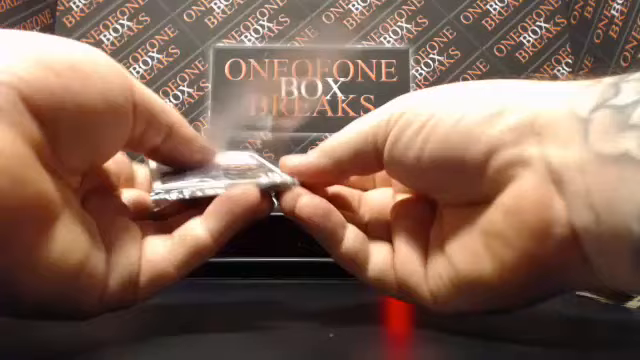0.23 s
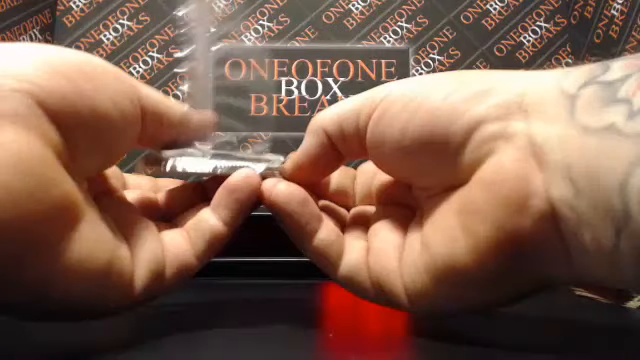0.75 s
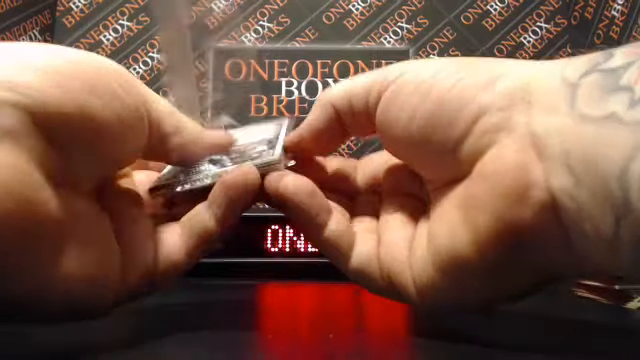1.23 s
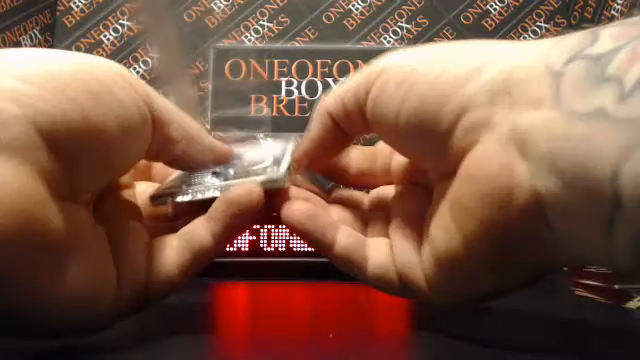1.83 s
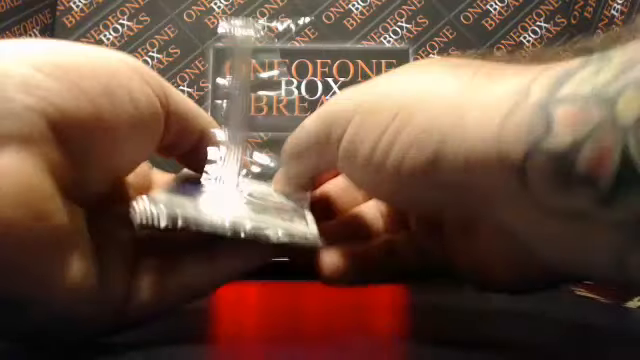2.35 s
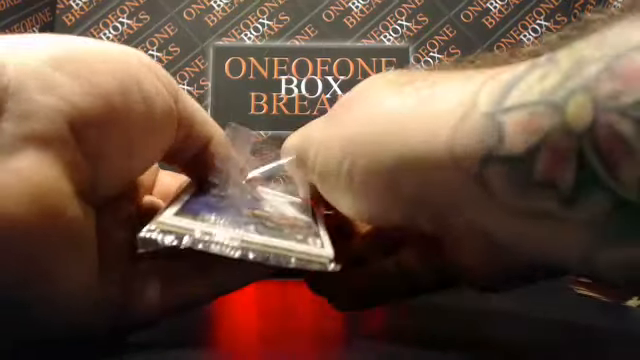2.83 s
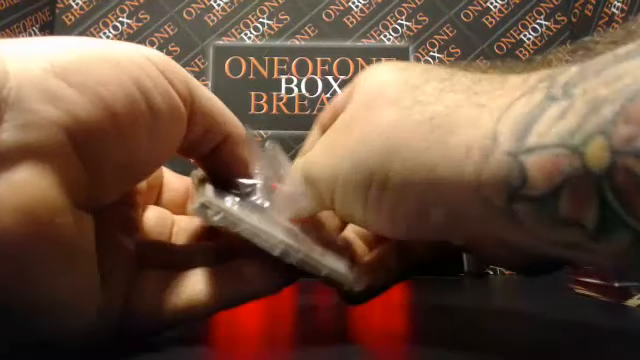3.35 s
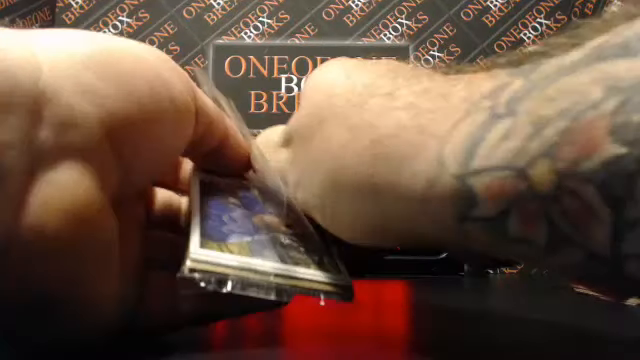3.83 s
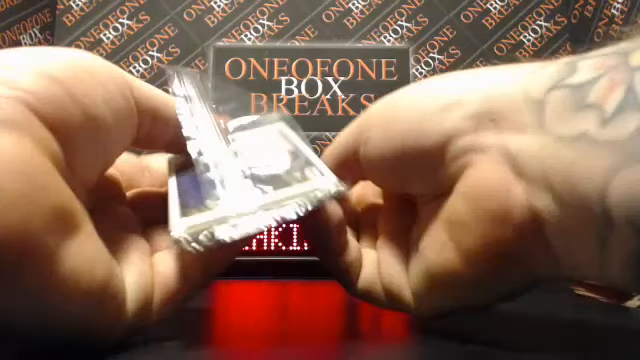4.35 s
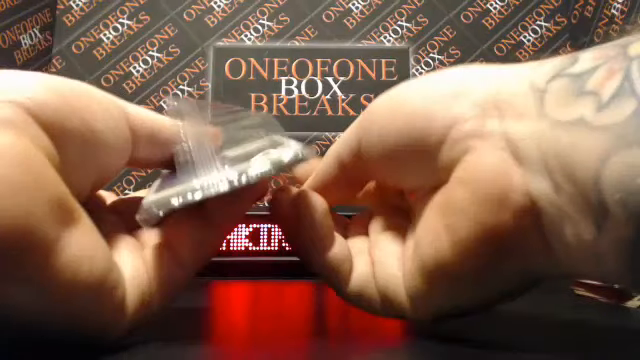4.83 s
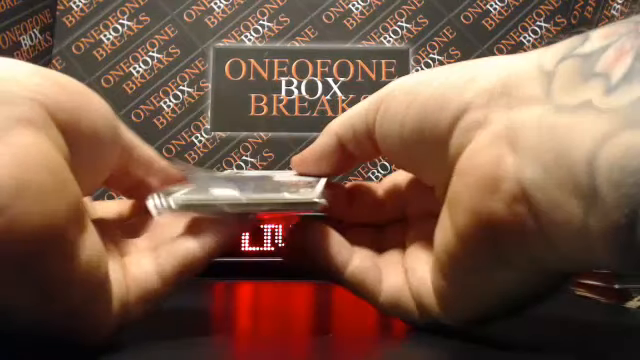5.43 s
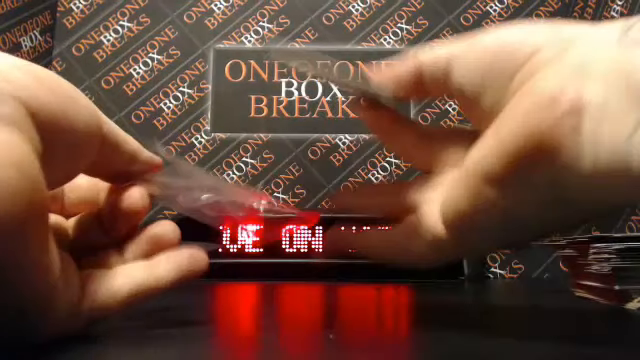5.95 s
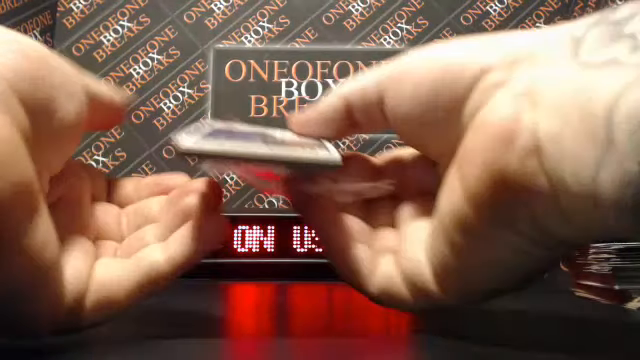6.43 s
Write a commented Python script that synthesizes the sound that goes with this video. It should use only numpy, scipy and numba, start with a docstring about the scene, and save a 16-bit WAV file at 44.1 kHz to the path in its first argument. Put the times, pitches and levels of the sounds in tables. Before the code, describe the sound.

Hands crinkle a small clear film wrapper around a card, crisp ticks and duller pops, soft desk bumps, quiet fan hum behind.

```python
"""Sharp clicks over faint crackle, as two hands work a thin, stiff plastic wrapper around a card.
Each crease that snaps is a group of short damped rings in patches of film, with a short noise tail.
Filtered noise gives the rough scrapes and a thin late hiss; one seam pops with a push of air.
Fingers bump the desk now and then, as slow low rings, over a low fan drone of flickering noise bands.
A small microphone close by thins the bass, holds quiet treble down and cuts the top steeply."""
import sys
import numpy as np
from scipy import signal
from scipy.fft import rfft, irfft
from scipy.io import wavfile
from scipy.ndimage import uniform_filter1d, minimum_filter1d
from numba import njit

SR = 44100
rng = np.random.default_rng(int(sys.argv[2]) if len(sys.argv) > 2 else 0)


def materialize(psi):
    """Save the field psi as 16-bit PCM at rate SR to the path in sys.argv[1].

    A 1-D psi becomes a single channel; in a 2-D psi each row is a channel.
    """
    bounded = np.clip(np.atleast_2d(psi).T, -1, 1)
    quanta = np.round(bounded * 32767).astype(np.int16)
    wavfile.write(sys.argv[1], SR, quanta)


N = 294588  # length [samples]
BRIGHT_HZ, DULL_HZ = (2500, 8000), (630, 2500)  # the film's two ranges of ringing


def undb(db):
    """Amplitude ratio of a level: ten to the power of decibels over twenty."""
    return 10 ** (np.asarray(db) / 20)


def level(x, db):
    """Scale to an rms level, the root of the mean power."""
    return x * undb(db) / np.sqrt(np.mean(x ** 2))


def band(x, lo_hz, hi_hz, order=2):
    """Butterworth band-pass: a passband without ripple."""
    return signal.sosfilt(signal.butter(order, [lo_hz, hi_hz], "bandpass", fs=SR, output="sos"), x)


def noise(n=N):
    """White noise: equal power at every frequency."""
    return rng.standard_normal(n)


def walk(rate):
    """Slow random modulation: values held 1 / rate s and smoothed twice, with a spread near 1."""
    k = int(SR / rate)
    steps = np.repeat(noise(N // k + 1), k)
    return np.sqrt(2) * uniform_filter1d(uniform_filter1d(steps, k), k)[:N]


@njit
def rings(s, hz, tau, size, phase, n, sr):
    """Superposition of damped oscillations that swell smoothly for tau seconds and then die away."""
    out = np.zeros(n)
    for k in range(len(s)):
        first = int(s[k] * sr) + 1
        for i in range(max(first, 0), min(first + int(6 * tau[k] * sr), n)):
            t = i / sr - s[k]
            u = t / tau[k]
            envelope = u * u * np.exp(2 - 2 * u)  # reaches 1 at t = tau
            out[i] += size[k] * envelope * np.sin(2 * np.pi * hz[k] * t + phase[k])
    return out


def clicks(s, main_hz, lo_hz, hi_hz, db, cycles, least_s, count, rest_db, smear_s, lean=1):
    """Modal excitation: a snap rings one patch of film and, a hair apart, weaker ones over the band."""
    fall_db_oct = 8  # patches far from the main pitch ring less
    faint_fall, faint_db = 0.45, -29.0  # more so per dB that a snap is fainter than this level
    chance = rng.random((len(s), count, 3))
    other = np.arange(count) > 0
    spread = lo_hz * (hi_hz / lo_hz) ** ((np.arange(count) - chance[..., 0]) / (count - 1))
    # a pitch of 0 means any pitch; lean above 1 favours low ones
    any_hz = lo_hz * (0.879 * hi_hz / lo_hz) ** chance[:, 0, 0] ** lean
    own = np.where(main_hz > 0, main_hz, any_hz)
    f = np.where(other, spread, own[:, None])
    start = s[:, None] + smear_s * chance[..., 1] * other
    fall = fall_db_oct + faint_fall * np.maximum(faint_db - db, 0)[:, None]
    octaves = np.abs(np.log2(f / own[:, None]))
    size = undb(db[:, None] + rest_db * other - fall * octaves)
    swell = least_s + cycles / f
    phase = 2 * np.pi * chance[..., 2]
    flat = (np.ravel(v) for v in (start, f, swell, size, phase))
    return rings(*flat, N, 1. * SR)


def snaps():
    """Impulsive release of strain: a crease rings a bright tick over a duller pop, or one patch alone."""
    # creases with two rings: (time [s], bright peak level [dB], bright ring [Hz],
    # dull peak level [dB], dull ring [Hz])
    double_creases = [(0.0138, -38.5, 5590, -55, 1100), (0.041, -37, 3800, -42, 960),
                      (0.307, -42, 3230, -52, 880), (0.4034, -30, 3360, -30, 970),
                      (1.0668, -35.5, 3670, -43, 2160), (1.0978, -30, 3700, -31, 1030),
                      (1.1097, -26.5, 6660, -29.5, 940), (1.4541, -45, 4180, -38.5, 826),
                      (1.5706, -34.0, 5660, -44.0, 2370), (1.6273, -33, 3880, -40.5, 1210),
                      (1.6387, -37, 3240, -46, 1230), (1.7761, -35.5, 6830, -38, 660),
                      (1.8743, -43.5, 4720, -52.0, 2200), (1.9159, -39, 5000, -40, 696),
                      (1.9334, -36.0, 5900, -32, 810), (1.9927, -35, 6360, -33, 2320),
                      (2.0012, -36.5, 4440, -36, 2490), (2.0985, -35.5, 4780, -38, 2300),
                      (2.1049, -34.5, 3770, -39, 2460), (2.1193, -36, 3900, -36, 2330),
                      (2.1777, -47, 6010, -38, 2350), (2.1907, -33.5, 4900, -28.5, 2190),
                      (2.2338, -40, 6090, -52, 2490), (2.2623, -23.5, 5700, -18, 1180),
                      (2.2737, -23.5, 5570, -23.5, 910), (2.3112, -33, 4300, -36, 950),
                      (2.3248, -34.5, 5500, -26.5, 1800), (2.3579, -42.0, 4940, -37.5, 2290),
                      (2.3954, -34.5, 2830, -48, 2000), (2.4926, -35.5, 2520, -33.5, 1700),
                      (2.4977, -38, 7060, -33, 2350), (2.506, -34.0, 4930, -36, 1900),
                      (2.5762, -30.5, 6060, -27.5, 2400), (2.6126, -36, 6320, -30.5, 2050),
                      (2.6726, -31, 7200, -38, 2250), (2.6853, -35.5, 5820, -36.5, 1970),
                      (2.7173, -22, 5960, -24, 1265), (2.8822, -43, 5030, -32.5, 1060),
                      (3.0244, -31.5, 3950, -32, 1190), (3.061, -34, 3330, -38, 2080),
                      (3.0698, -29, 3000, -33, 1890), (3.1005, -37.5, 3300, -41.5, 1100),
                      (3.2153, -23.5, 2790, -27, 1690), (3.2294, -24.5, 4900, -20.5, 2220),
                      (3.2378, -22.5, 4650, -19.5, 1220), (3.258, -39, 5200, -36.5, 1280),
                      (3.3139, -30, 2810, -39.5, 1530), (3.3532, -38, 4890, -34.5, 2180),
                      (3.3581, -34.5, 4400, -40, 1850), (3.4609, -38, 4780, -50, 2480),
                      (3.646, -23, 2870, -28.5, 984), (3.672, -35.5, 2770, -36.5, 1090),
                      (3.7143, -33.5, 6200, -34.5, 1700), (3.7474, -32, 2590, -28.5, 2440),
                      (3.788, -23, 6980, -18.5, 1200), (3.829, -45, 5230, -29, 1390),
                      (3.835, -24.5, 4760, -23.5, 2460), (3.8425, -21.5, 5560, -21.5, 1850),
                      (3.8881, -37, 4800, -30, 2400), (3.8925, -37, 5970, -30, 1530),
                      (3.91, -34.5, 5770, -34.5, 1380), (3.9452, -39, 2650, -40, 2470),
                      (3.9526, -31.5, 3470, -32.5, 2360), (3.9777, -34.5, 5460, -31, 2140),
                      (4.0493, -36, 3130, -39, 2300), (4.1593, -35.5, 5000, -41.5, 1880),
                      (4.3439, -22.5, 4500, -23.5, 1316), (4.4432, -32, 4500, -26.5, 2120),
                      (4.453, -48, 6160, -43, 1030), (4.585, -28, 4470, -28, 1760),
                      (4.5983, -37.5, 2710, -39.5, 773), (4.81, -31, 4600, -33, 1270),
                      (4.8887, -42, 6140, -38, 2430), (4.905, -30.5, 5000, -29.5, 2040),
                      (4.9258, -43, 5100, -46, 2350), (5.0495, -32, 5100, -33, 1890),
                      (5.0635, -31.5, 4900, -35, 2040), (5.2185, -31, 6080, -32.5, 2000),
                      (5.2337, -33, 2630, -36.5, 1960), (5.2417, -28, 5330, -35.5, 2270),
                      (5.2503, -40.5, 5850, -31, 1245), (5.4193, -38, 6200, -40, 2370),
                      (5.4372, -55, 5840, -41.5, 1610), (5.7016, -31, 3260, -42.5, 2080),
                      (5.7058, -28.5, 5500, -29, 2210), (5.7413, -26, 3800, -31, 890),
                      (5.7755, -24.5, 5040, -27.5, 860), (6.066, -34, 4840, -32.5, 2650),
                      (6.3332, -30.5, 4520, -36.5, 2460), (6.448, -35, 3100, -55, 2430),
                      (6.4578, -31, 3030, -67, 1980), (6.4678, -35, 3920, -52, 2120),
                      (6.479, -40, 3980, -36.5, 2180), (6.492, -39, 5170, -42, 2260),
                      (6.499, -34, 3460, -33, 2100)]
    # creases with one main ring: (time [s], peak level [dB], ring [Hz])
    single_creases = [(0.0751, -32.5, 3120), (0.076, -38.0, 1000), (0.137, -40.5, 650),
                      (0.1377, -25.5, 5040), (0.1673, -33, 5360), (0.3427, -40, 2040), (0.3685, -34, 6630),
                      (0.4186, -41.0, 1800), (0.4605, -40, 6860), (0.499, -35.5, 3270),
                      (0.626, -48.0, 4760), (0.7312, -38.5, 3460), (0.751, -39.5, 3730),
                      (0.813, -44.5, 5020), (0.928, -44, 3850), (1.0113, -30, 5160), (1.0395, -32, 3800),
                      (1.0762, -32.5, 6230), (1.0892, -31.5, 4730), (1.196, -49, 5700),
                      (1.2285, -38.5, 6160), (1.345, -51.5, 2180), (1.4369, -21, 4060), (1.4816, -37, 6060),
                      (1.4937, -39, 3370), (1.5093, -31, 5150), (1.5149, -25, 4950), (1.561, -34, 4400),
                      (1.694, -37, 3530), (1.787, -24.5, 4200), (1.825, -34, 6400), (1.8569, -32, 1810),
                      (1.9795, -38.5, 6210), (1.9887, -33, 6600), (2.1556, -27, 6260), (2.21, -31, 2800),
                      (2.2146, -31, 6840), (2.246, -33.0, 2080), (2.2875, -27, 2500), (2.484, -30, 6940),
                      (2.5391, -31.5, 4900), (2.7803, -27, 2970), (2.8475, -30.5, 5900),
                      (2.859, -31.5, 4690), (2.8685, -29.0, 4840), (2.8736, -24, 1520), (2.9013, -33, 5100),
                      (2.9369, -30, 5630), (3.0111, -22, 6000), (3.0378, -36, 4470), (3.162, -22, 2400),
                      (3.1711, -14.5, 1780), (3.2453, -26.5, 4720), (3.2532, -27.0, 4830),
                      (3.3652, -23.5, 5400), (3.3702, -36, 4760), (3.4008, -32, 6390),
                      (3.4751, -22.5, 5900), (3.4833, -34, 4550), (3.5463, -45, 3700), (3.6229, -32, 1390),
                      (3.6884, -35, 6000), (3.6984, -25.5, 5880), (3.776, -38.5, 2600),
                      (3.8113, -18.5, 2480), (3.8369, -21.5, 5690), (3.852, -31.5, 1080),
                      (4.062, -24.5, 5070), (4.1056, -29.5, 5600), (4.1203, -32.5, 5250),
                      (4.143, -22.5, 5620), (4.1843, -27, 4730), (4.192, -35.5, 4710),
                      (4.6752, -31.5, 4730), (4.823, -28, 6000), (4.8256, -30.5, 908), (4.8459, -41, 4340),
                      (4.855, -30.5, 4880), (4.8627, -21, 5700), (4.934, -36.5, 2020),
                      (5.0403, -31.5, 5020), (5.0825, -35.5, 5400), (5.1083, -30.5, 4800),
                      (5.193, -33, 6320), (5.2008, -22.5, 5840), (5.2466, -28.5, 5420),
                      (5.5856, -38.5, 5120), (5.8768, -31.5, 4300), (5.9779, -44, 2900),
                      (6.294, -46.5, 4560), (6.3824, -38, 3880)]
    deep_hz = 2250  # single creases below this are dull pops
    tick_low_hz = 1092  # the faint side patches of a tick reach down to here
    s, bright_db, bright_hz, dull_db, dull_hz = np.transpose(double_creases)
    tick_s, tick_db, tick_hz = np.transpose(single_creases)
    s, tick_s = s - .0005, tick_s - .0005  # the swell begins just before the peak
    bright = clicks(s, bright_hz, *BRIGHT_HZ, bright_db, cycles=0.62, least_s=0.00025,
                    count=5, rest_db=-2.5, smear_s=0.00043)
    dull = clicks(s, dull_hz, *DULL_HZ, dull_db, cycles=1.0, least_s=.0001,
                  count=3, rest_db=-11.0, smear_s=0.00083)
    deep = tick_hz < deep_hz
    ticks = clicks(tick_s[~deep], tick_hz[~deep], tick_low_hz, BRIGHT_HZ[1], tick_db[~deep],
                   cycles=0.68, least_s=0.00026, count=6, rest_db=-6.0, smear_s=0.000796)
    low = clicks(tick_s[deep], tick_hz[deep], *DULL_HZ, tick_db[deep],
                 cycles=0.9, least_s=.0001, count=3, rest_db=-16.0, smear_s=0.0008)
    return bright + ticks, dull + low


def crackle(per_s, lo_hz, hi_hz, scatter_db, cycles, lean=1):
    """Random superposition: faint clicks at random moments, a few louder than the rest; rms 1."""
    chance = rng.random((int(per_s * N / SR), 2))
    db = -scatter_db * np.log(np.maximum(chance[:, 1], .03))
    s = chance[:, 0] * N / SR
    grains = clicks(s, 0 * s, lo_hz, hi_hz, db, cycles, least_s=.0001,
                    count=2, rest_db=-6.5, smear_s=0.000476, lean=lean)
    return level(grains, 0)


def swell_envelope(x, rise_s, fall_s):
    """Smoothed energy: a short swell that rises just ahead of each loud snap and falls after it."""
    t = np.arange(-.06, .06, 1 / SR)
    near = np.exp(-(t / np.where(t < 0, rise_s, fall_s)) ** 2)
    return np.sqrt(np.abs(signal.fftconvolve(x ** 2, near / near.sum(), "same")))


def bursts(s, length, db):
    """Incoherent addition: each burst swells to its middle and fades again; their powers add."""
    edge_db, shape = -7, 1.31  # level at the ends of the length, re the middle; how round the top is
    step = 32  # samples for which the envelope is held
    away = np.abs(np.arange(0, N, step) / SR - s[:, None]) / (length[:, None] / 2)
    power = undb(db[:, None] + edge_db * away ** shape) ** 2
    return np.repeat(np.sqrt(power.sum(axis=0)), step)[:N]


def rub(hz):
    """Band-limited noise: a smooth hiss under the crackle, as of film on film."""
    return undb(-12) * level(band(noise(), *hz), 0)


def rustle(bright, dull):
    """Amplitude modulation: grainy noise shaped into short bursts and a short swell round each snap."""
    # short bursts of faint crackle, many of them tails of snaps:
    # (middle [s], length [s], bright level [dB], dull level [dB])
    faint_bursts = [(0.008, 0.14, -67, -60), (0.245, 0.042, -63, -59), (0.301, 0.051, -62, -54),
                    (0.353, 0.049, -63.5, -64.5), (0.452, 0.033, -59, -54), (0.504, 0.023, -59, -60.5),
                    (0.746, 0.051, -63, -80), (0.821, 0.017, -57, -73), (1.092, 0.059, -50.5, -52),
                    (1.482, 0.094, -51, -70), (1.503, 0.06, -61, -49), (1.57, 0.016, -58, -58),
                    (1.636, 0.029, -55.5, -52.5), (1.78, 0.023, -55.5, -48.5), (1.84, 0.074, -60.5, -70),
                    (1.932, 0.031, -51.5, -48), (2.003, 0.015, -47, -51.5), (2.023, 0.03, -59, -65),
                    (2.115, 0.035, -51, -60), (2.19, 0.066, -56.5, -65), (2.276, 0.057, -42.5, -41),
                    (2.328, 0.041, -49.5, -69), (2.398, 0.016, -50.5, -57.5), (2.508, 0.019, -58, -53),
                    (2.62, 0.019, -56, -50), (2.675, 0.031, -55.5, -79), (2.792, 0.021, -45.5, -58.5),
                    (2.88, 0.039, -44, -49), (3.023, 0.033, -47.5, -54), (3.18, 0.071, -53, -60),
                    (3.253, 0.037, -45.5, -54.5), (3.345, 0.044, -54.5, -54), (3.648, 0.066, -67, -54.5),
                    (3.793, 0.012, -37, -32.5), (3.833, 0.045, -39.5, -34.5), (3.896, 0.024, -41, -65.5),
                    (3.949, 0.024, -48.5, -62), (4.027, 0.031, -56, -61.5), (4.151, 0.058, -51.5, -62.5),
                    (4.45, 0.038, -51.5, -52), (4.596, 0.02, -48, -52), (4.68, 0.066, -61.5, -59),
                    (4.824, 0.02, -40, -36), (4.875, 0.06, -50, -52), (4.93, 0.045, -53.5, -59.5),
                    (5.067, 0.043, -53, -77), (5.244, 0.028, -50.5, -47), (5.433, 0.027, -53.5, -61),
                    (5.738, 0.048, -46.5, -42.5), (6.472, 0.05, -49.5, -59)]
    swell_power = 1.4  # the bright swell grows faster than its snap
    stray_db = -84  # rms level of the sparse, tiny ticks that the held film makes all the while
    s, length, bright_db, dull_db = np.transpose(faint_bursts)
    fine = crackle(1100, *BRIGHT_HZ, 4.5, .9) + rub(BRIGHT_HZ)
    coarse = crackle(500, *DULL_HZ, 4.5, 1.0, lean=1.2) + rub(DULL_HZ)
    bright_swell = undb(5.0) * swell_envelope(bright, rise_s=0.002, fall_s=0.0018) ** swell_power
    dull_swell = undb(-15) * swell_envelope(dull, rise_s=0.0038, fall_s=0.0017)
    fine = fine * (bursts(s, length, bright_db) + bright_swell)
    coarse = coarse * (bursts(s, length, dull_db) + dull_swell)
    stray = crackle(40, *BRIGHT_HZ, 2.5, .5)
    return fine + undb(stray_db) * stray, coarse


def thin_film(x):
    """Inefficient radiation at low frequency: the thin film gives off little below the cutoff."""
    return signal.sosfilt(signal.butter(3, 520, "highpass", fs=SR, output="sos"), x)


def pop():
    """Volume displacement: the seam pops open and pushes air at the microphone in one direction."""
    middle_s, length_s, peak_db = 3.7881, 0.00098, -13  # peak before the return flow is taken off
    t = np.arange(N) / SR
    push = undb(peak_db) * np.exp(-(2 * (t - middle_s) / length_s) ** 4)
    return push - uniform_filter1d(uniform_filter1d(push, 220), 220)  # the air flows back round it


def hollow(struck):
    """Resonance: narrow modes ring on after the dull clicks and the pop."""
    # modes: (centre [Hz], width [Hz], gain [dB])
    modes = [(638.6, 31, 5.5), (785, 19, -8), (1140, 25, -14.5)]
    return sum(undb(db) * band(struck, hz - w / 2, hz + w / 2, order=1) for hz, w, db in modes)


def scrapes():
    """Rough friction: as the card edge drags on the film, grainy noise rings one broad patch."""
    # drags: (middle [s], length [s], ring [Hz], level [dB])
    drags = [(0.045, 0.048, 1220, -54), (4.002, 0.071, 2100, -51), (4.173, 0.041, 1090, -48.5),
             (6.465, 0.055, 3000, -51)]
    wide = 1.2  # edges of the patch, as a ratio to its middle
    grit = level(noise() * undb(6.7 * walk(150)), 0)
    total = np.zeros(N)
    for s, length, hz, db in drags:
        patch = level(band(grit, hz / wide, hz * wide), 0)
        total += patch * bursts(*np.array([[s], [length], [db]], float))
    return total


def short_tail(x):
    """Convolution with decaying noise: a short noise tail after each click, cut off quickly."""
    tail_db, low_s, high_s = -16, 0.014, 0.013  # tail level re direct sound; decay times
    t = np.arange(int(.12 * SR)) / SR
    rise = 1 - np.exp(-t / 0.00057)
    low = band(noise(len(t)), 300, 2500) * np.exp(-(t / low_s) ** 1.4)
    high = band(noise(len(t)), 2500, 9000) * np.exp(-(t / high_s) ** 1.4)
    tail = rise * (low + high)
    return x + undb(tail_db) * signal.fftconvolve(x, tail / np.linalg.norm(tail))[:N]


def swish():
    """Sliding friction as high band noise: a thin, wavering hiss as the card slides free near the end."""
    lo_hz, hi_hz, db = 6200, 7700, -73  # rms level before the waver and fade
    start_s = 6.56
    fade = np.interp(np.arange(N) / SR, [start_s - .02, start_s + .03], [0, 1])
    waver = undb(2 * walk(25))
    return fade * waver * level(band(noise(), lo_hz, hi_hz), db)


def bumps():
    """Structure-borne sound: soft finger bumps reach the microphone as low rings through the desk."""
    # bumps: (time [s], peak level [dB], ring [Hz], swell [s])
    knocks = [(0.06, -49, 331, 0.021), (0.271, -50, 340, 0.013), (0.958, -48, 283, 0.0073),
              (2.265, -54.5, 166, 0.0055), (2.473, -54, 174, 0.0062), (3.8, -49, 248, 0.0063),
              (3.831, -34, 241, 0.003), (4.901, -50.5, 203, 0.0057), (5.426, -45.5, 185, 0.009),
              (5.515, -53, 197, 0.01), (5.621, -56, 178, 0.01), (5.7, -43, 183, 0.0064),
              (6.216, -52, 347, 0.011)]
    s, db, hz, swell = np.transpose(knocks).copy()
    return rings(s, hz, swell, undb(db), np.zeros(len(s)), N, 1. * SR)


def fan():
    """Broadband noise in flickering half-octave bands, a narrow housing resonance and motor hum."""
    # colour of the drone: (frequency [Hz], relative level per hertz [dB])
    colour = [(40, -9.5), (85, -23), (195, -1), (250, -3), (420, -15.5), (530, -21), (640, -7.5),
              (900, -11), (1300, -23.5), (2000, -21.5), (3000, -35), (4700, -24), (7300, -27), (9000, -37)]
    drone_db, flicker_hz = -66.5, 350  # rms level; above this frequency the drone is ever steadier
    tone_hz, tone_width_hz, tone_db = 333, 15, -65  # housing resonance
    hum_hz, hum_db = 120, -83.5
    hz, db = np.transpose(colour)
    f = np.maximum(np.arange(N // 2 + 1) * SR / N, 1)
    drone = irfft(rfft(noise()) * undb(np.interp(np.log(f), np.log(hz), db)), N)
    edges = 40 * 2 ** np.arange(0, 8.5, .5)
    flickering = np.zeros(N)
    for lo, hi in zip(edges, edges[1:]):
        flicker = undb(2.0 * min(1, flicker_hz / lo) * walk(14))
        flickering += flicker * band(drone, lo, hi)
    tone = band(noise(), tone_hz - tone_width_hz / 2, tone_hz + tone_width_hz / 2, order=1)
    hum = level(np.sin(2 * np.pi * hum_hz * np.arange(N) / SR), hum_db)
    return level(flickering, drone_db) + level(undb(2.6 * walk(12)) * tone, tone_db) + hum


def scene():
    """Linear superposition: film sounds with their short tails, then the sounds without a tail."""
    loud = snaps()
    bright, dull = np.add(loud, rustle(*loud))
    push = pop()
    struck = dull + undb(-20) * push  # a little of the push rings the hollow
    wrapper = short_tail(thin_film(bright + dull) + hollow(struck) + scrapes())
    return (wrapper + swish() + bumps() + push + fan())[None]


def treble_suppressor(x, split_hz, open_db, depth_db, hold_s):
    """Downward expansion of the treble: held down until it rises past a level, then let through."""
    low = signal.sosfiltfilt(signal.butter(2, split_hz, fs=SR, output="sos"), x)
    treble = x - low
    loud = np.sqrt(np.abs(uniform_filter1d(treble ** 2, 128)))
    hold = int(hold_s * SR) // 2 * 2 + 1
    held = -minimum_filter1d(-loud, hold, origin=hold // 3)  # mostly after the sound, a little before
    gain = np.clip((held / undb(open_db)) ** 2, undb(depth_db), 1)
    return low + uniform_filter1d(gain, 200) * treble


def quiet_expander(x, top_db, ratio, average_s):
    """Slight downward expansion: a ratio below 1 lowers sound under the top level, none above it."""
    keep = np.exp(-1 / (average_s * SR))
    power = signal.lfilter([1 - keep], [1, -keep], x ** 2)
    return x * np.minimum(1, (undb(top_db) ** 2 / (power + 1e-12)) ** ((1 - 1 / ratio) / 2))


def record(dry):
    """Transducer response: thinned bass, coloured treble, expansion, a steep top cut and faint hiss."""
    # colour of the capsule: (frequency [Hz], gain [dB])
    capsule = [(2500, 0), (3500, -3.5), (5500, 1), (7000, 2), (8200, 2.5)]
    top_hz = 7700
    f = np.arange(N // 2 + 1) * SR / N
    bass = 1 / np.sqrt(1 + (84 / (f + 1)) ** 6)
    hz, db = np.transpose(capsule)
    x = irfft(rfft(dry) * bass * undb(np.interp(f, hz, db)), N)
    x = treble_suppressor(x, split_hz=4360, open_db=-65.5, depth_db=-20.0, hold_s=0.021)
    x = quiet_expander(x, top_db=-40.5, ratio=0.97, average_s=0.005)
    # the stopband, 45 dB down, begins a little above the top
    x = signal.sosfilt(signal.cheby2(10, 45, 1.13 * top_hz, fs=SR, output="sos"), x)
    hiss = undb(-93.0) * noise(x.shape)
    return signal.sosfilt(signal.ellip(8, .2, 30, 15800, fs=SR, output="sos"), x + hiss)


dry = scene()
out = record(dry)
materialize(out)
```